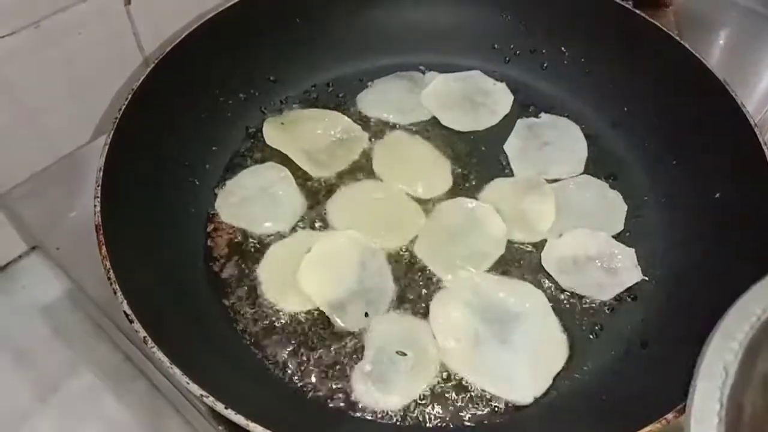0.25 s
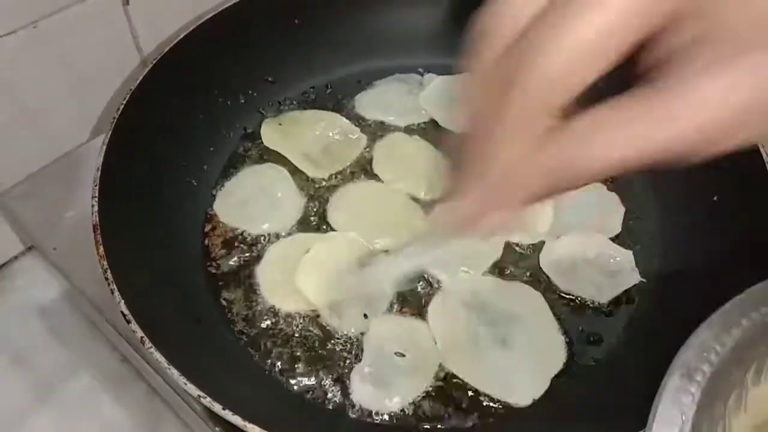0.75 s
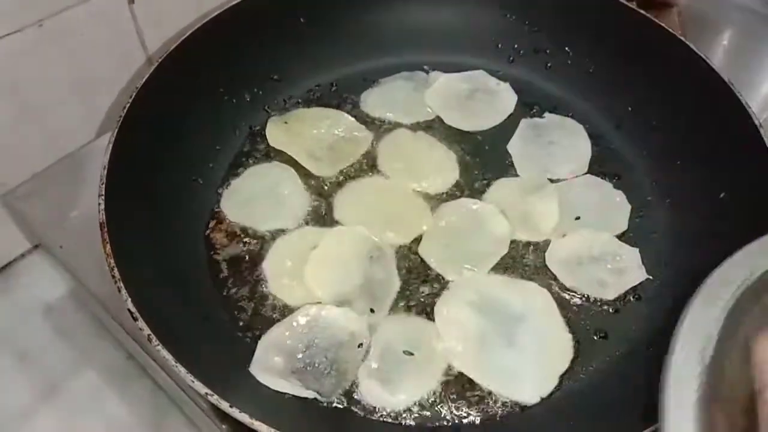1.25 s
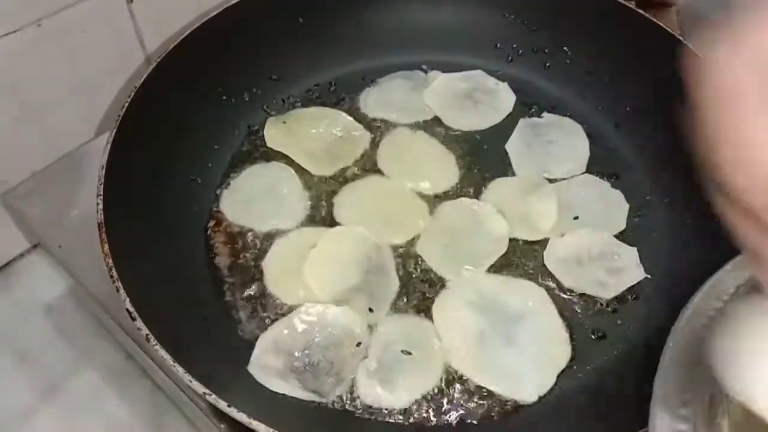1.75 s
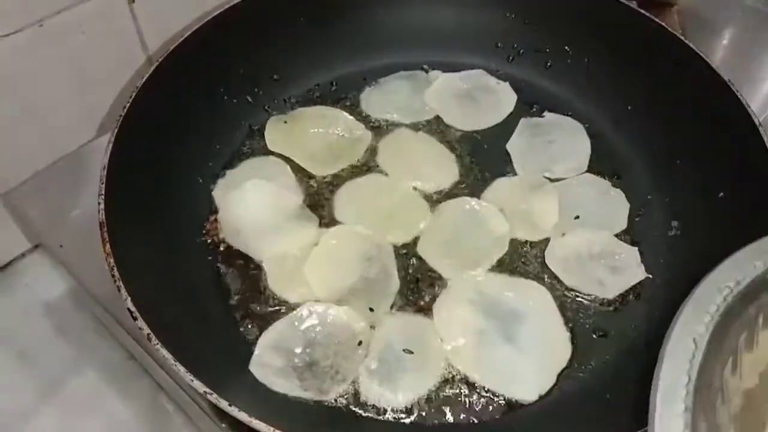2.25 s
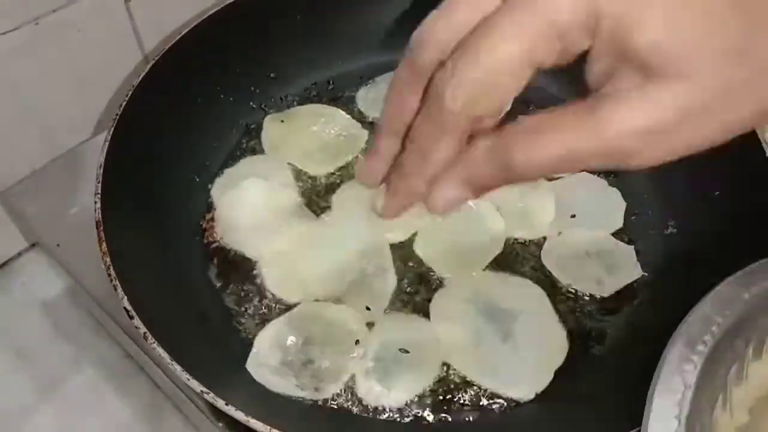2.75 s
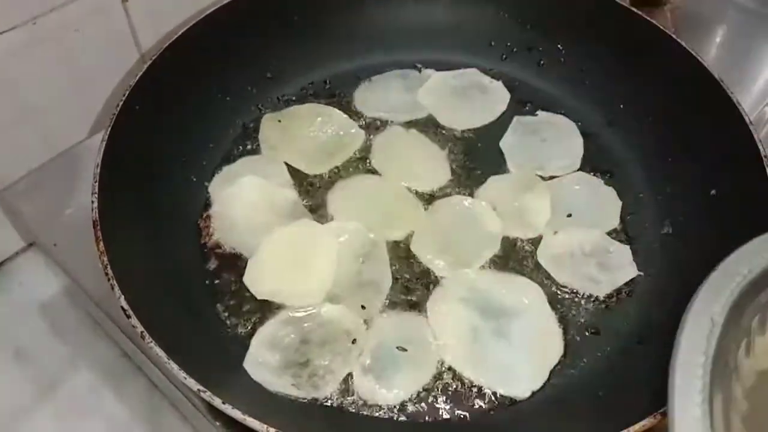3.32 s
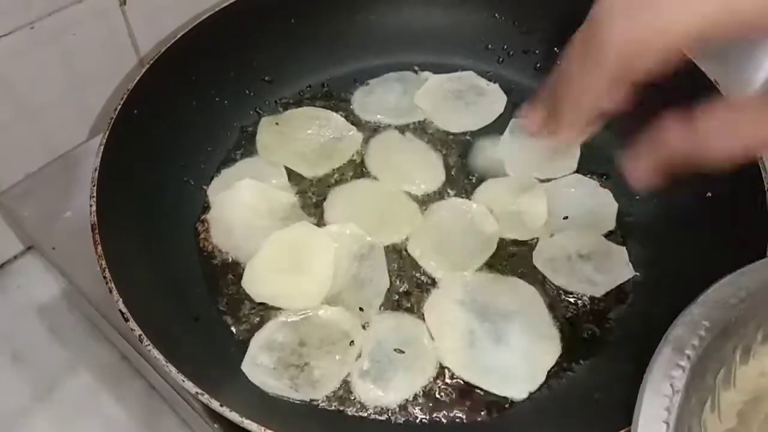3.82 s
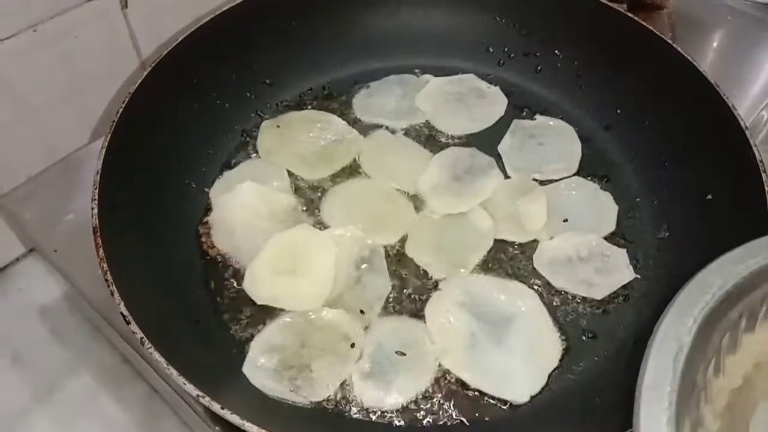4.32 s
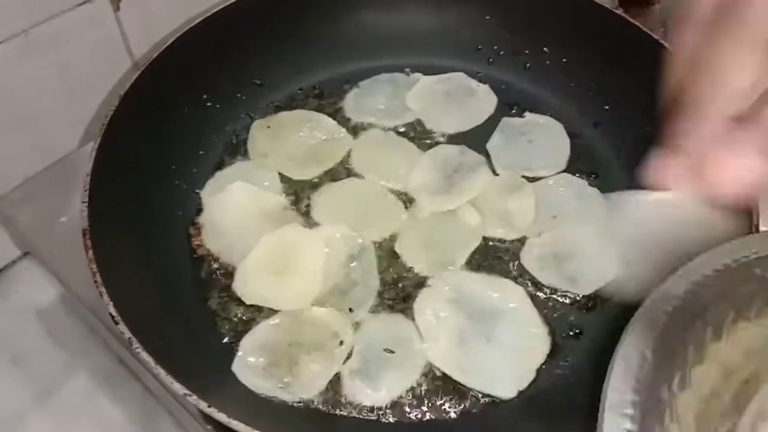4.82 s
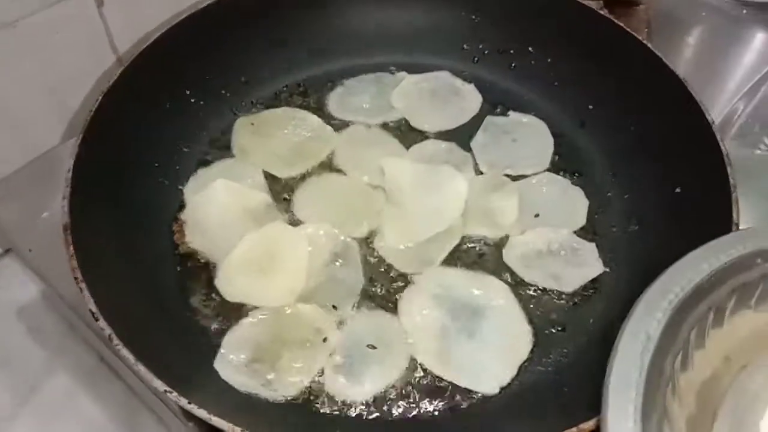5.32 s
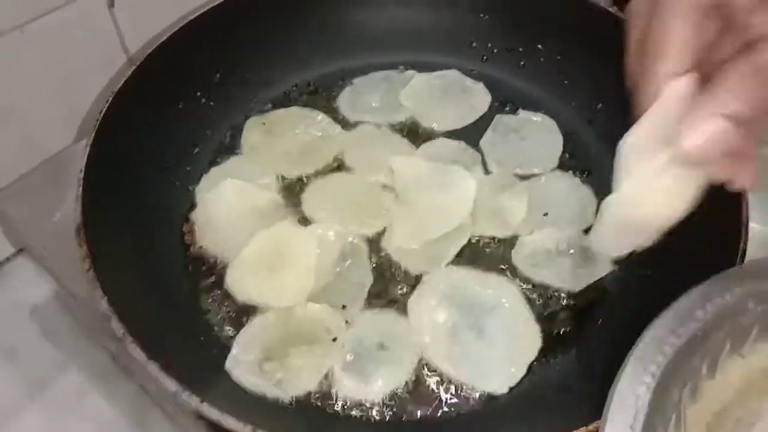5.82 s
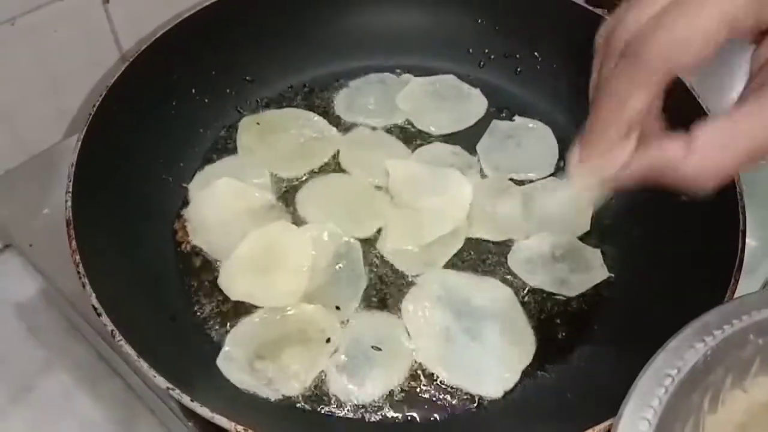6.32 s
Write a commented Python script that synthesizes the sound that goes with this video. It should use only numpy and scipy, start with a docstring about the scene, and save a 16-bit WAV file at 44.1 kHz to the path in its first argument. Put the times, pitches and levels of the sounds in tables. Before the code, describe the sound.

Close, bright sizzling of potato slices in shallow oil, flaring with spits, pops and small wet slaps against the pan.

```python
"""A small kitchen, just above a pan of wet potato slices frying in shallow oil.
Countless steam bubbles burst as a sizzle that flares when water meets oil and sinks as it boils off.
Water drops crack, steam chirps from under the slices, and slices plop down and ring the pan.
Beneath are a low rumble, faint hums, soft swishes and handling bumps. A few oil drops hit
the microphone, whose limiter ducks the loudest spits."""
import sys
import numpy as np
from scipy import signal
from scipy.fft import rfft, irfft
from scipy.io import wavfile
from scipy.ndimage import uniform_filter1d, minimum_filter1d

SR = 44100
rng = np.random.default_rng(int(sys.argv[2]) if len(sys.argv) > 2 else 0)


def inscribe(sig):
    """Save sig as 16-bit PCM at rate SR to the path in sys.argv[1].

    A 1-D sig is mono; a 2-D sig holds one channel per row.
    Samples are clipped to [-1, 1] before scaling.
    """
    pcm = np.round(np.clip(np.atleast_2d(sig).T, -1, 1) * 32767)
    wavfile.write(sys.argv[1], SR, pcm.astype(np.int16))


N = 289296
TIME = np.arange(N) / SR

# pan modes: (frequency [Hz], level [dB], t60 [s])
PAN_MODES = [(760, -9, .09), (828, -6, .05), (979, -9, .06), (1150, -9, .05), (1270, -3, .08),
             (1502, -13, .08), (1591, -8, .14), (1814, -7, .07), (1965, -7, .07), (2221, -11, .09),
             (2519, -9, .05), (2783, -10, .06)]


def from_db(db):
    """Decibels to gain."""
    return 10 ** (np.asarray(db) / 20)


def unit_rms(x):
    """Scale to rms 1."""
    return x / np.sqrt(np.mean(x ** 2) + 1e-20)


def at_hz(spectrum, hz):
    """Interpolate (frequency [Hz], level [dB]) rows over log frequency."""
    knots_hz, knots_db = np.array(spectrum).T
    return np.interp(np.log(hz), np.log(knots_hz), knots_db)


def band(x, low_hz, high_hz, order=2):
    """Causal band-pass."""
    edges_hz = np.clip([low_hz, high_hz], 10, [.44 * SR, .45 * SR])
    return signal.sosfilt(signal.butter(order, edges_hz, "band", fs=SR, output="sos"), x)


def decay(t60_s, length_s):
    """Envelope falling 60 dB in t60_s."""
    return from_db(-60 * TIME[:int(length_s * SR)] / t60_s)


def swell(peak_s, sigma_s):
    """Gaussian envelope."""
    return np.exp(-.5 * ((TIME - peak_s) / sigma_s) ** 2)


def puff(t60_s):
    """Decaying noise burst."""
    fade = decay(t60_s, .5)
    return fade * rng.standard_normal(len(fade))


def linger(power, tau_s):
    """Give power an exponential tail; mean 1."""
    held = signal.lfilter([1], [1, -np.exp(-1 / (tau_s * SR))], power + 1e-18)
    return held / held.mean()


def scaled(sound, db, held_s=.01):
    """Scale to the energy of a level held for held_s."""
    return from_db(db) * sound * np.sqrt(held_s * SR / np.sum(sound ** 2))


def add(out, start_s, sound):
    """Mix a sound in at start_s."""
    at = int(round(start_s * SR))
    out[at:at + len(sound)] += sound[:N - at]


def scattered(level_db, spread_db, centre_hz, spread_oct, count):
    """Random rows (time [s], level [dB], pitch [Hz]) about a level curve and a pitch."""
    when, size, pitch = rng.random((count, 3)).T
    at = (when * N).astype(int)
    db = level_db[at] + spread_db * (2 * size - 1)
    hz = centre_hz * 2 ** (spread_oct * (2 * pitch - 1))
    return list(zip(at / SR, db, hz))


def echoed(sound, wall_t60_s=.045, wall_db=-8, room_t60_s=.3, room_db=-10):
    """Add pan-wall echoes and the kitchen's tail, different for each spot in the pan."""
    wall = scaled(puff(wall_t60_s), wall_db, 1 / SR)
    room = scaled(puff(room_t60_s), room_db, 1 / SR)
    gap = np.zeros(int(.001 * SR))
    return sound + signal.fftconvolve(sound, np.concatenate([gap, wall + room]))[:len(sound)]


def flare_db(attack_s=.01, release_s=.25):
    """Water meets hot oil: the frying flares quickly and dies back."""
    # flares: (time [s], strength [dB])
    flares = [(0.0, 2.5), (.33, 3), (.83, 3), (1.03, 1.5), (1.25, 2.0), (1.87, 1.5), (2.92, 2), (3.15, 2.5),
              (3.98, 2), (4.28, 2.0), (4.85, 3.0), (5.36, 3)]
    ages = [(np.maximum(TIME - s, 0), db) for s, db in flares]
    return sum(db * (1 - np.exp(-age / attack_s)) * np.exp(-age / release_s) for age, db in ages)


def bubbling_db(start_db=-26.5, sag_db_per_s=.21, flare_gain=1.26):
    """Level of the coarse bubbling, sinking as the water boils off."""
    return start_db - sag_db_per_s * TIME + flare_gain * flare_db()


def fizz_db(start_db=-25.5, sag_db_per_s=.85):
    """Level of the fine fizz, which sinks faster."""
    return start_db - sag_db_per_s * TIME + flare_db()


def rumble(start_db=-54, sag_db_per_s=.55, flare_gain=.59, waver_db=2.5, waver_per_s=7):
    """Low stove and room noise; it lifts with each flare, and each octave wavers on its own."""
    # rumble spectrum: (frequency [Hz], relative density [dB])
    spectrum = [(25, -12), (50, -20), (80, -0.5), (115, 0), (180, -1), (245, -14), (305, -4), (375, -13.5),
                (460, -4), (650, -6), (1000, -14)]
    colour = from_db(at_hz(spectrum, np.fft.rfftfreq(N, 1 / SR) + 1))
    edges_hz = np.geomspace(25, 1600, 7)
    noise = np.zeros(N)
    for low_hz, high_hz in zip(edges_hz, edges_hz[1:]):
        waver = np.interp(TIME * waver_per_s, np.arange(N), rng.standard_normal(N))
        coloured = irfft(rfft(rng.standard_normal(N)) * colour, N)
        noise += from_db(waver_db * waver) * band(coloured, low_hz, high_hz)
    return from_db(start_db - sag_db_per_s * TIME + flare_gain * flare_db()) * unit_rms(noise)


def hums(width_hz=22):
    """Faint low tones of narrow noise waver, swell and fade."""
    # hums: (peak time [s], sigma [s], pitch [Hz], level [dB])
    tones = [(.34, 0.054, 445, -50.5), (4.627, .08, 290, -59), (4.994, 0.034, 299, -53.5),
             (5.56, 0.18, 111, -49), (6.35, 0.19, 122, -54)]
    out = np.zeros(N)
    for peak_s, sigma_s, hz, db in tones:
        tone = unit_rms(band(rng.standard_normal(N), hz - width_hz / 2, hz + width_hz / 2))
        out += from_db(db) * swell(peak_s, sigma_s) * tone
    return out


def swishes(low_hz=1450, high_hz=1920, gain_db=-7.5):
    """A soft, narrow rush comes and goes."""
    # swishes: (peak time [s], sigma [s], level [dB])
    swells = [(0.43, 0.069, -29.5), (0.994, 0.079, -26), (1.61, 0.092, -25), (5.696, 0.14, -32),
              (6.507, 0.1, -32.5)]
    envelope = sum(from_db(db + gain_db) * swell(peak_s, sigma_s) for peak_s, sigma_s, db in swells)
    return envelope * unit_rms(band(rng.standard_normal(N), low_hz, high_hz, order=5))


def bumps(t60_s=.032, gain_db=6):
    """Handling bumps, each a few cycles of a low tone."""
    # bumps: (time [s], level [dB], pitch [Hz])
    thuds = [(1.26, -27, 215), (1.277, -29.5, 217), (3.008, -39, 500), (3.182, -25, 202), (3.982, -40, 169),
             (4.162, -40, 180)]
    out = np.zeros(N)
    fade = decay(t60_s, .2)
    for s, db, hz in thuds:
        add(out, s, from_db(db + gain_db) * fade * np.sin(2 * np.pi * hz * TIME[:len(fade)]))
    return band(out, 120, 740)


def oil_drops(swing_db=5.5, swing_hz=92, swing_q=1.6):
    """A drop on the port gives one pressure push; the microphone swings back slowly."""
    # drop impacts: (time [s], push level [dB], contact time [s])
    impacts = [(.216, 15, .00007), (.3324, -20, .0003), (1.853, -7, .00012), (2.2596, -5, .00033)]
    push = np.zeros(N)
    for s, db, contact_s in impacts:
        age = TIME[:int(.02 * SR)] / contact_s
        add(push, s, from_db(db) * age * np.exp(1 - age))
    w = 2 * np.pi * swing_hz
    b, a = signal.bilinear([w / swing_q, w * w], [1, w / swing_q, w * w], SR)
    swing = from_db(swing_db) * signal.lfilter(b, a, push)
    return band(push - swing, 60, 12000)


def ticks(per_s=24, gain_db=15.5, spread_db=2.5):
    """Fine spatter in the open oil: bright clicks that follow the fizz level."""
    sizes = from_db(gain_db + spread_db * np.minimum(rng.exponential(1, N), 3))
    signs = rng.choice([-1, 1], N)
    fired = rng.random(N) < per_s / SR
    clicks = sizes * signs * fired * from_db(fizz_db())
    return band(clicks + 1e-18, 6000, 14000, order=1)


def plops(ring_db=-9.5, damping=1.53, knock_db=-1.5, knock_hz=720, snap_db=-8):
    """A slice knocks the pan with a wet snap, damps its ring and pushes the oil aside."""
    # slices slapping down or lifting on steam: (time [s], ring and snap [dB], knock and splash [dB])
    slaps = [(0.465, -13, -42), (.827, -18.5, -59), (.873, -21.5, -54), (0.934, -21, -66),
             (1.153, -19, -52), (1.321, -19, -39.5), (3.151, -18.5, -50), (3.329, -17.5, -58),
             (3.44, -21.5, -62), (3.978, -24, -41), (4.162, -22, -46), (4.44, -22, -42),
             (4.668, -23.5, -73), (5.366, -18.5, -33), (5.46, -28.5, -68), (5.736, -22.5, -62)]
    out, t = np.zeros(N), TIME[:int(.5 * SR)]
    ring = sum(from_db(db) * decay(t60_s / damping, .5) * np.sin(2 * np.pi * hz * t) * (-1) ** k
               for k, (hz, db, t60_s) in enumerate(PAN_MODES))
    knock = decay(t60_s=.02, length_s=.5) * np.sin(2 * np.pi * knock_hz * t)
    lesser_db = bubbling_db() + 2.5
    lesser = [(at / SR, lesser_db[at], -60) for at in rng.integers(0, N, size=7)]
    for s, db, dull_db in slaps + lesser:
        add(out, s, scaled(ring, db + ring_db) + scaled(knock, dull_db + knock_db))
        snap = band(puff(t60_s=.016), 1450, 4200)
        add(out, s, echoed(scaled(snap, db + snap_db)))
        splash = band(puff(t60_s=.23), 400, 1050, order=1)
        add(out, s, scaled(splash, dull_db, held_s=.07))
    return out


def chirps(snap_db=-6.5, snap_t60_s=.0088, snap_ratio=1.55, sputter_ratio=1.09):
    """Steam snaps out from under a slice, then sputters through a wet gap ringing at one pitch."""
    # loudest steam squeaks: (time [s], level [dB], pitch [Hz], t60 [s])
    squeaks = [(.354, -26.5, 3960, .04), (.608, -25.5, 3550, .06), (1.155, -20.5, 3030, .04),
               (1.891, -21.5, 3880, 0.055), (2.017, -23, 2800, .05), (2.027, -21, 3150, 0.11),
               (2.055, -20, 2550, 0.084), (2.67, -29, 3600, .04), (2.704, -22, 3600, 0.19),
               (2.812, -26, 3650, 0.069), (3.712, -28, 3740, 0.064), (3.868, -31, 3050, 0.088),
               (4.25, -26.5, 3400, 0.056), (4.29, -24, 2660, 0.15), (4.393, -26.5, 3540, 0.14),
               (4.497, -26, 3570, .04), (4.681, -26.5, 4000, .04), (4.739, -28, 2680, 0.098),
               (5.654, -30, 3800, 0.036), (5.928, -27.5, 3980, .05), (6.31, -25.5, 4120, 0.031)]
    out = np.zeros(N)
    lesser = scattered(bubbling_db() - 5.5, spread_db=1, centre_hz=3900, spread_oct=.18, count=6)
    for s, db, hz, t60_s in squeaks + [(*row, .04) for row in lesser]:
        snap = band(puff(snap_t60_s), hz / snap_ratio, hz * snap_ratio)
        sputter = band(puff(t60_s), hz / sputter_ratio, hz * sputter_ratio)
        add(out, s, echoed(scaled(snap, db + snap_db) + scaled(sputter, db)))
    return out


def cracks(snap_t60_s=.0031, spray_t60_s=.03, spray_db=-25.5, edge_ratio=1.48, gain_db=-1.5):
    """A water drop bursts in the oil: a snap, then a short spray."""
    # loudest bursts: (time [s], level [dB], pitch [Hz])
    bursts = [(.176, -18.5, 9550), (0.333, -20.5, 11700), (0.408, -16.5, 7800), (.467, -8.5, 5150),
              (.654, -22, 9900), (.768, -15.5, 10100), (.826, -18.5, 4960), (0.872, -21, 11000),
              (1.059, -15, 10200), (1.152, -11, 4040), (1.247, -20.5, 11100), (1.853, -5, 7040),
              (2.132, -17.5, 9800), (2.395, -16, 10700), (2.532, -21.5, 9150), (2.938, -26, 13000),
              (3.199, -17.5, 11000), (3.822, -21.5, 7900), (3.925, -23, 7400), (4.289, -19.5, 9300),
              (5.367, -15, 7600), (5.406, -13.5, 8200), (5.609, -20.5, 4570), (6.088, -22.5, 12400)]
    out = np.zeros(N)
    lesser = scattered(fizz_db() + 4, spread_db=.5, centre_hz=8600, spread_oct=.5, count=26)
    for s, db, hz in bursts + lesser:
        burst = puff(snap_t60_s) + from_db(spray_db) * puff(spray_t60_s)
        burst = band(burst, hz / edge_ratio, hz * edge_ratio, order=1)
        burst = band(burst, 600, 13000)
        add(out, s, echoed(scaled(burst, db + gain_db, held_s=.004)))
    return out


def sizzle(per_s=1400, spread_db=3, burst_s=.00072, echo_s=.009, width_oct=.37, hiss_power=.54,
           gain_db=4):
    """Tiny bubbles burst at random, each a puff around its own pitch, over the hiss of the smallest."""
    # sizzle spectrum: (frequency [Hz], relative density [dB])
    spectrum = [(750, -9), (1050, -10), (1400, -7), (2100, -5), (3000, -3), (3800, 0), (4700, -7.5),
                (6500, 0), (9300, -4), (11500, -12), (13500, -14), (16000, -10.5)]
    born = np.flatnonzero(rng.random(N) < per_s / SR)
    power = from_db(spread_db * np.minimum(rng.exponential(1, N), 4.76))[born] ** 2
    pitch_oct = rng.uniform(np.log2(600), np.log2(20000), N)[born]
    coarse_db, fine_db = bubbling_db(), fizz_db()
    edges_hz = np.geomspace(720, 17000, 16)
    out = np.zeros(N)
    for low_hz, high_hz in zip(edges_hz, edges_hz[1:]):
        hz = np.sqrt(low_hz * high_hz)
        in_band = np.exp(-.5 * ((pitch_oct - np.log2(hz)) / width_oct) ** 2)
        bursts = np.bincount(born, power * in_band, N)
        envelope = np.sqrt(hiss_power + linger(bursts, burst_s) + linger(bursts, echo_s))
        noise = band(unit_rms(envelope * rng.standard_normal(N)), low_hz, high_hz)
        fizz_share = np.clip(np.log2(hz / 4000), 0, 1)   # the treble follows the fizz
        level_db = coarse_db + fizz_share * (fine_db - coarse_db)
        out += from_db(level_db + at_hz(spectrum, hz) + gain_db) * noise
    return band(out, 660, 19000, order=4)


def in_pan(x, ring_db=5):
    """Add the ring of the pan's modes, driven by x."""
    out = x
    for hz, db, t60_s in PAN_MODES:
        q = np.pi * hz * t60_s / np.log(1000)
        b, a = signal.iirpeak(hz, q, fs=SR)
        out = out + from_db(db + ring_db) * signal.lfilter(b, a, x)
    return out


def mic_port(x):
    """The microphone's port lifts some bands and hollows others."""
    # port resonances and dips: (centre [Hz], width [Hz], gain [dB])
    resonances = [(1285, 193, 12), (6900, 3100, 2.5), (6250, 187, -10.5), (8030, 250, -8.5),
                  (9280, 1430, 5), (15300, 290, 1), (15070, 310, 13.5)]
    for hz, width_hz, db in resonances:
        half_width, lift = np.tan(np.pi * width_hz / SR), from_db(db / 2)
        tuning = -2 * np.cos(2 * np.pi * hz / SR)
        b = [1 + half_width * lift, tuning, 1 - half_width * lift]
        a = [1 + half_width / lift, tuning, 1 - half_width / lift]
        x = signal.lfilter(b, a, x)
    return x


def limiter(x, hold_s=.036, slide_s=.012):
    """Gain slides down ahead of a peak over full scale, holds and recovers."""
    cut_db = np.minimum(0, -20 * np.log10(np.abs(x) + 1e-9))
    held_db = minimum_filter1d(cut_db, int(hold_s * SR))
    return x * from_db(uniform_filter1d(held_db, int(slide_s * SR)))


def scene():
    """Frying over the kitchen's background, plus bumps and drops on the microphone; mono."""
    frying = in_pan(sizzle() + swishes()) + ticks() + cracks() + chirps() + plops()
    return (frying + rumble() + hums() + bumps() + oil_drops())[None]


def record(dry, cutoff_hz=15600):
    """Port colour, limiter, steep low-pass."""
    low_pass = signal.ellip(10, .2, 70, cutoff_hz, fs=SR, output="sos")
    return signal.sosfilt(low_pass, limiter(mic_port(dry)))


dry = scene()
out = record(dry)
inscribe(out)
```